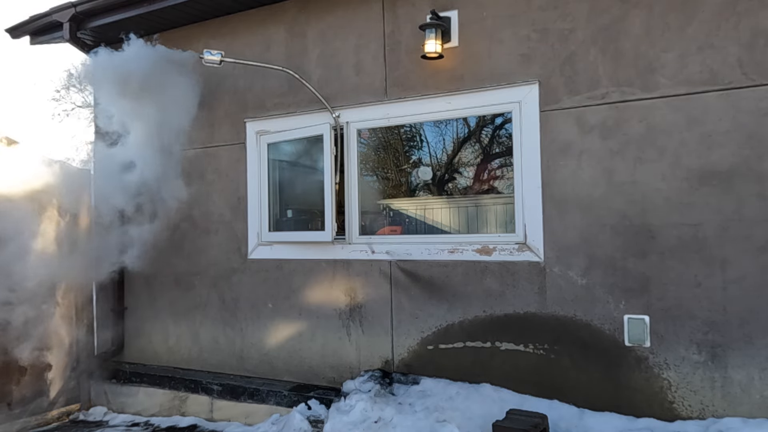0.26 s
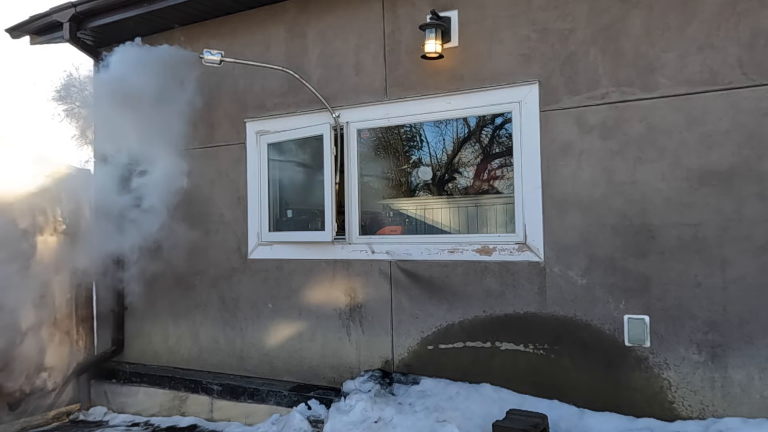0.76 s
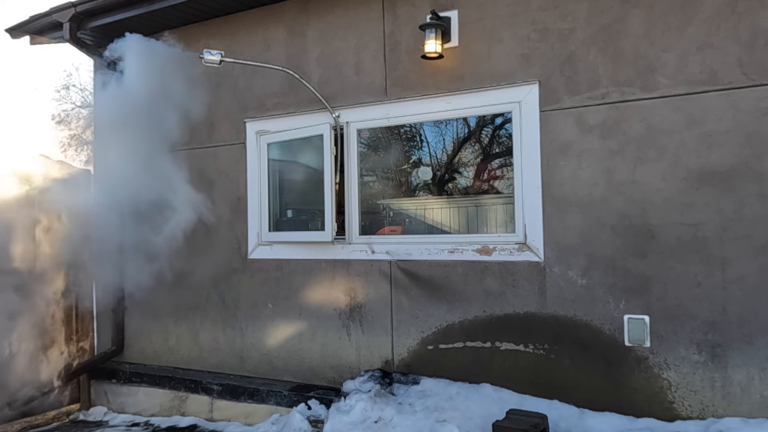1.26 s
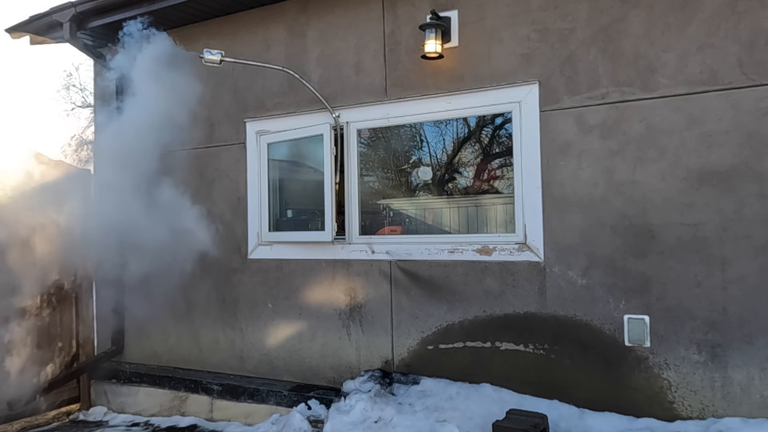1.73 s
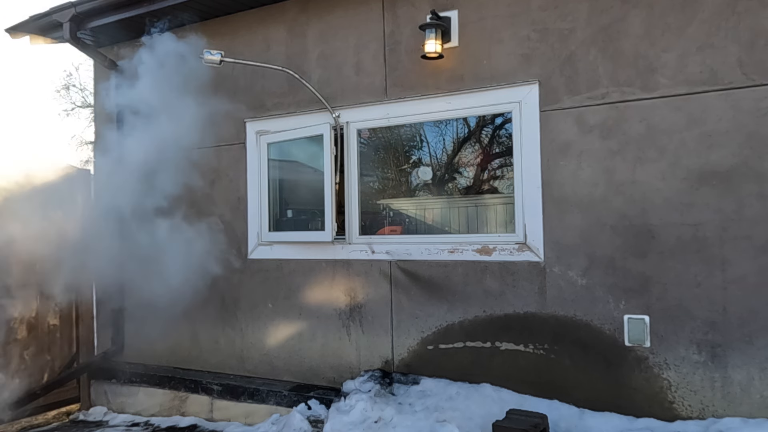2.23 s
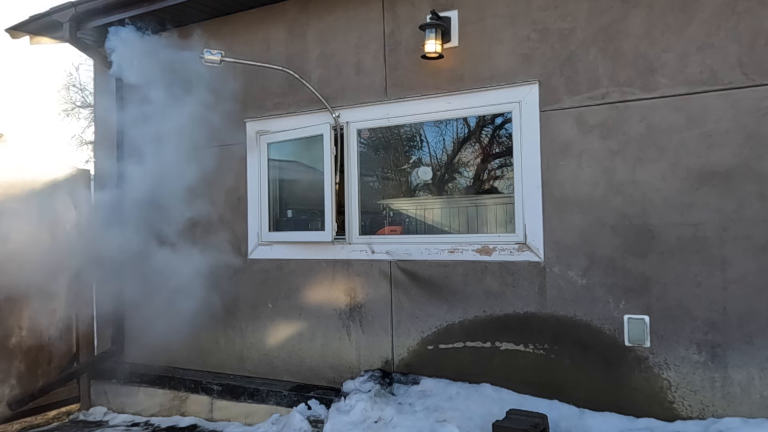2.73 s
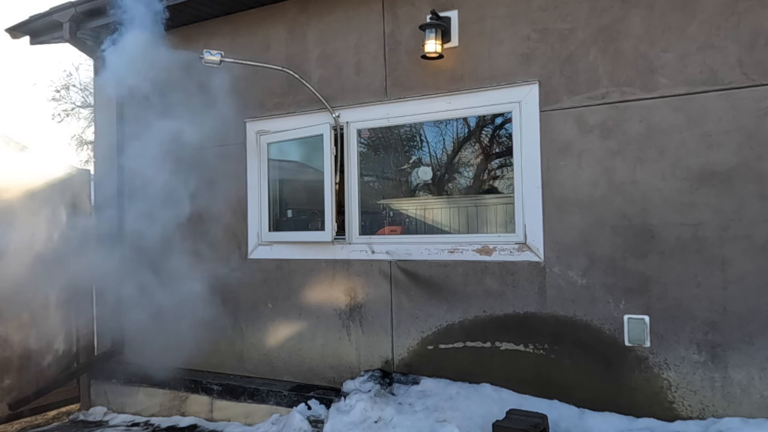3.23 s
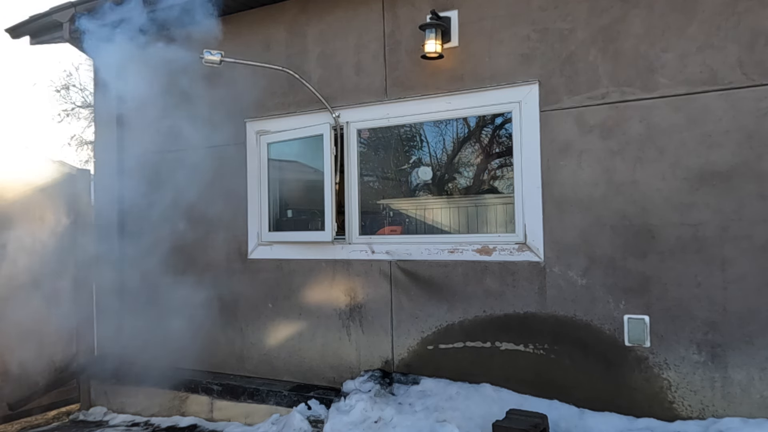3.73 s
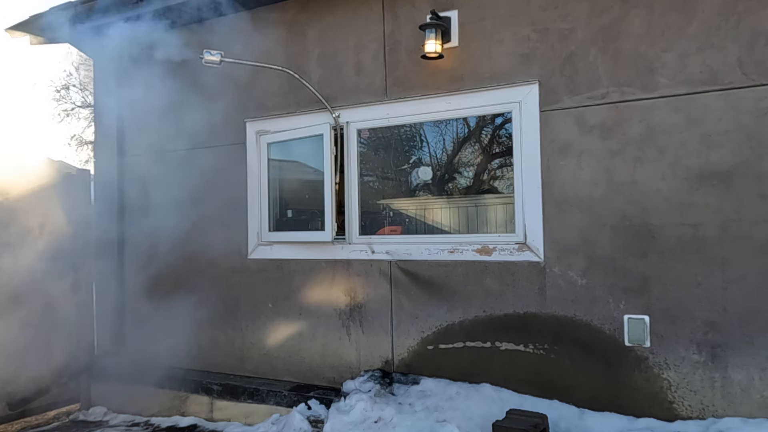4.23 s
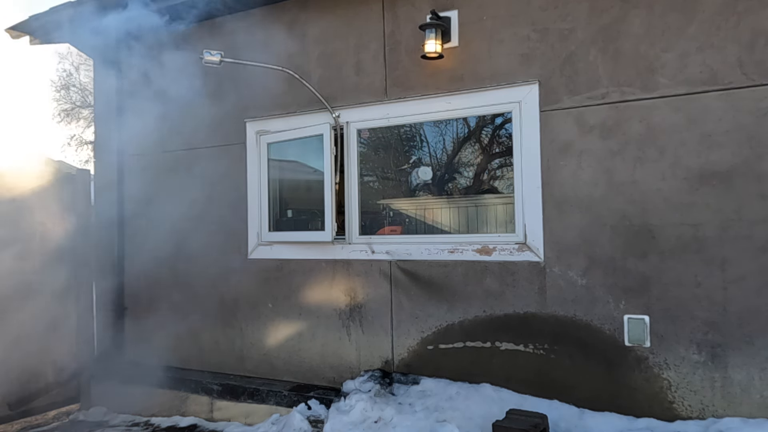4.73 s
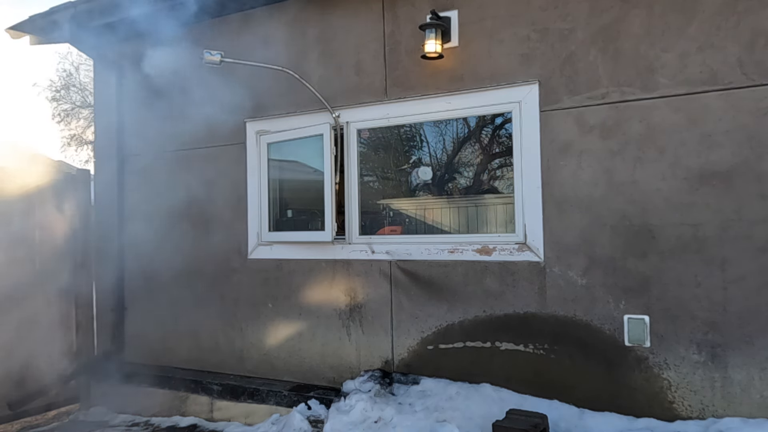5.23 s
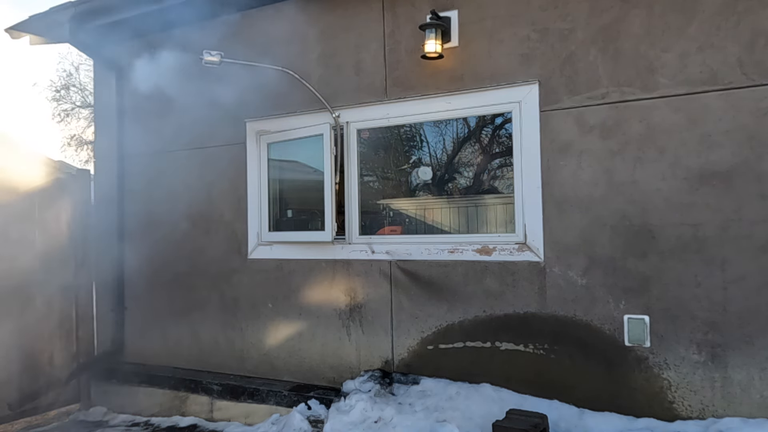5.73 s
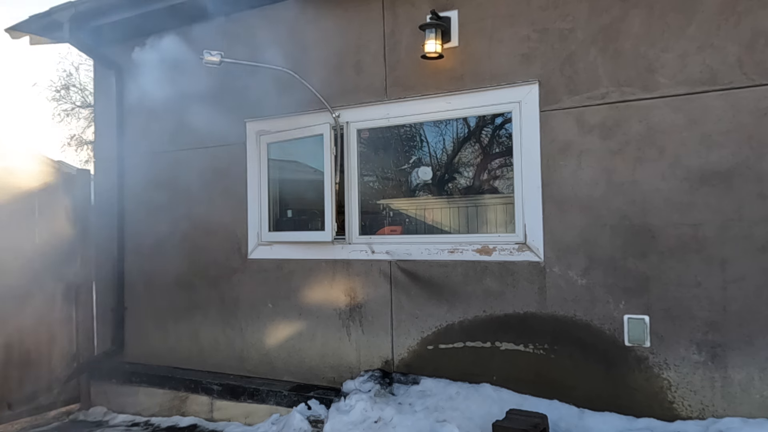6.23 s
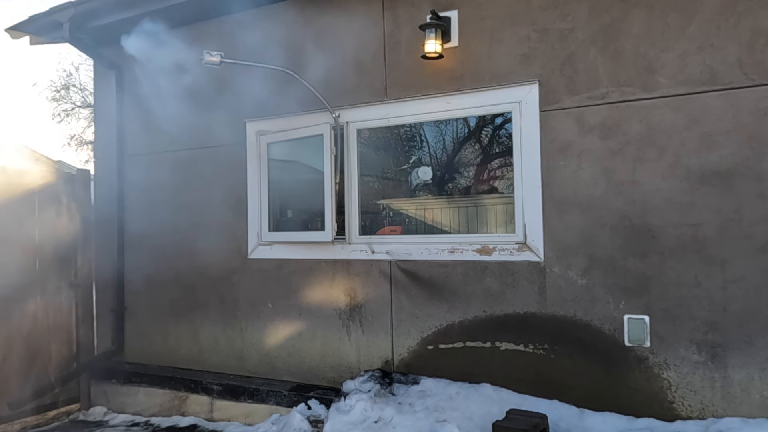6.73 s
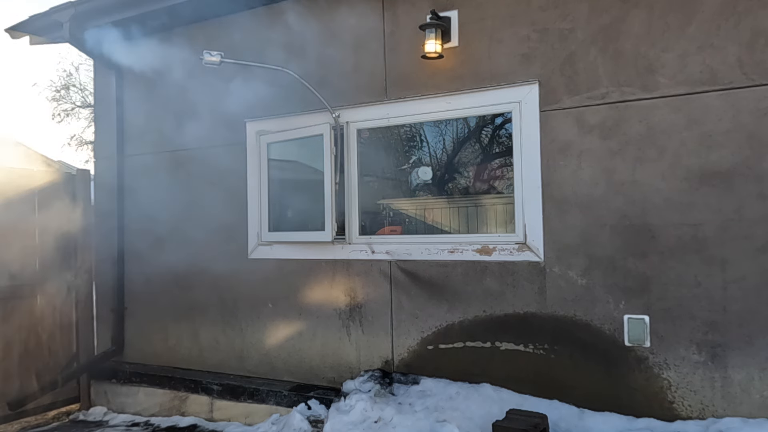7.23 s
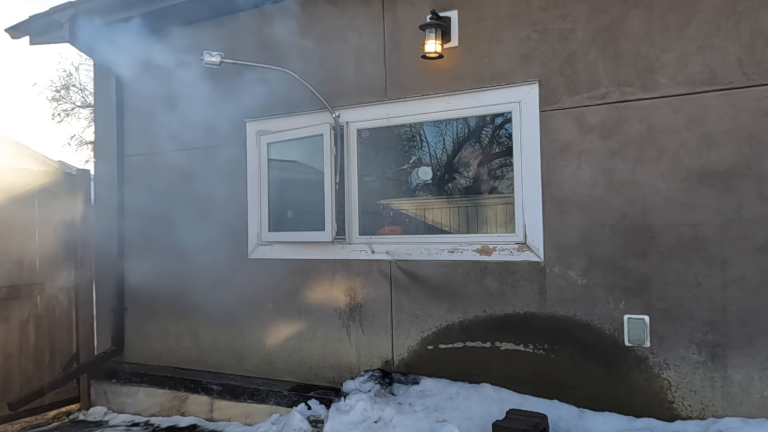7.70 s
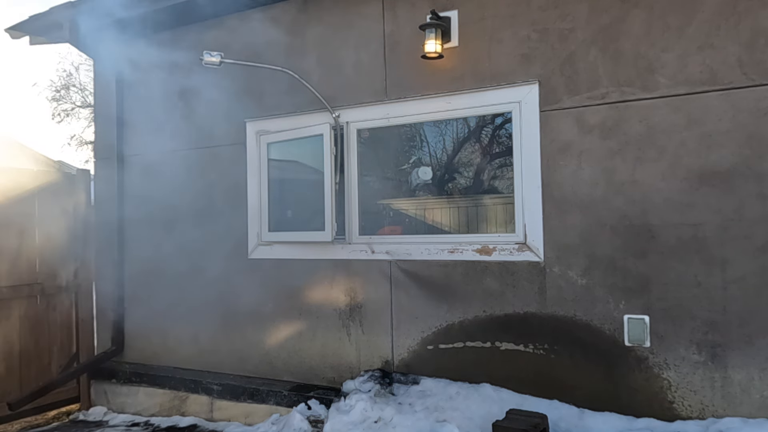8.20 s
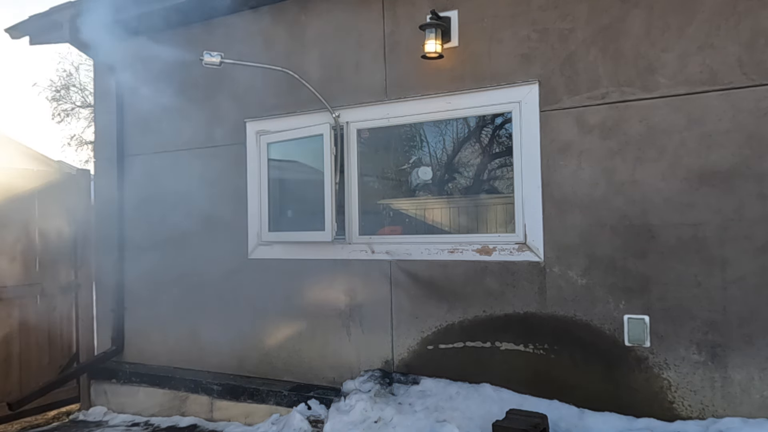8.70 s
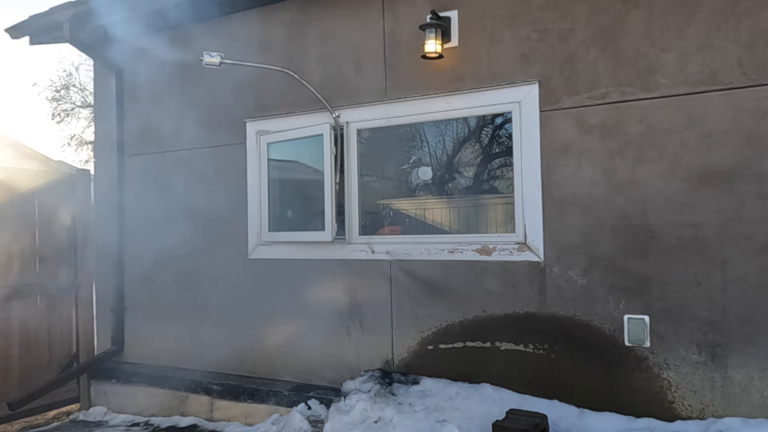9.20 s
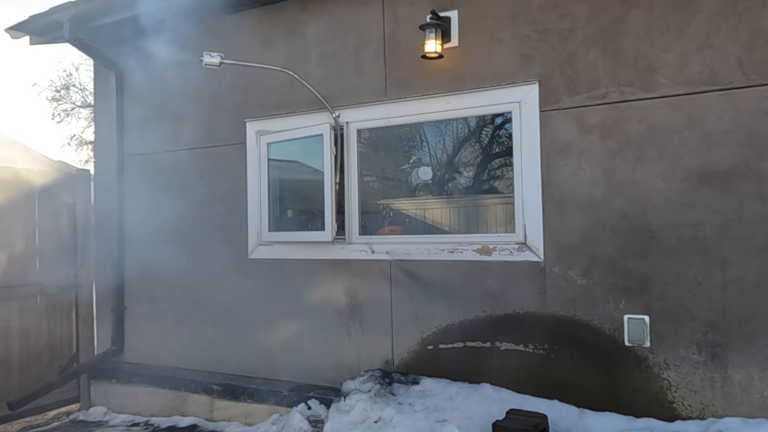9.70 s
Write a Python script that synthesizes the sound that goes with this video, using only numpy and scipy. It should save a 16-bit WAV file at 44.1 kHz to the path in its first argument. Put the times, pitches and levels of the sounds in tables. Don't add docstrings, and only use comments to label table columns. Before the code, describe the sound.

A close outdoor stereo take of a heater exhaust: dark throbbing rumble, hollow pipe resonance, soft air hiss and a thin constant whine. Low gusts buffet the microphone, mostly on the right, in the first seconds, midway and at the end. Light regular drips and scattered brittle snaps sit on top, with a far bird chirping three times while the burner slowly eases down.

```python
import sys
import numpy as np
from scipy import signal
from scipy.fft import rfft, irfft, next_fast_len
from scipy.io import wavfile
from scipy.ndimage import uniform_filter1d

SR = 44100
rng = np.random.default_rng(int(sys.argv[2]) if len(sys.argv) > 2 else 0)


def wav_out(sig):
    wavfile.write(sys.argv[1], SR, np.round(np.clip(np.atleast_2d(sig).T, -1, 1) * 32767).astype(np.int16))


def boost_factor(decibels):
    exponent = np.asarray(decibels, float) / 20
    return 10 ** exponent


N = 438794
TIME = np.arange(N) / SR


def level(x, db):
    return x * boost_factor(db) / np.sqrt(np.mean(x ** 2))


def columns(table):
    s, *rest = np.transpose(table)
    return [np.interp(TIME, s, c) for c in rest]


def walk(rate):
    k = int(SR / rate)
    held = np.repeat(rng.standard_normal(N // k + 1), k)
    return 1.03 * uniform_filter1d(uniform_filter1d(held, k), k)[:N]


def colour(x, points):
    hz, db = np.transpose(points)
    size = next_fast_len(N)
    f = np.arange(size // 2 + 1) * SR / size + 1
    gain = boost_factor(np.interp(np.log(f), np.log(hz), db))
    return irfft(rfft(x, size) * gain, size)[:N]


def ring(x, hz, width):
    return signal.lfilter(*signal.iirpeak(hz, hz / width, fs=SR), x)


def resonate(modes, flicker_db):
    noise = rng.standard_normal((2, N))
    out = 0
    for hz, width, db in modes:
        drive = np.roll(noise, rng.integers(N), axis=1)
        mode = ring(ring(drive, hz, width), hz, width)
        out = out + boost_factor(db + flicker_db * walk(8.1)) * mode
    return level(out, 0)


def flame():
    # (time [s], level [dB])
    burn = [(0, -1), (.6, 0.5), (1.2, -0.5), (2.1, 1), (2.6, 0.5), (3.6, .3), (4.1, -1.4), (4.6, -2),
            (5.4, -3.5), (6.1, -2.5), (7, -4.5), (8, -6), (9, -4.5), (9.95, -8)]
    surges_db = [2.5, 2.5, 2.1, 0.7, 2.2, 2.4, 3.1, 3.7, 1.5, 4.3, 3.1, 2.8, 4.7]
    # (frequency [Hz], width [Hz], level [dB])
    deep_modes = [(58.4, 29, -9), (71.5, 16, -1.5), (91.4, 54, -11)]
    boom_modes = [(114.8, 9.6, -5), (123, 14.5, 0.5)]
    pipe_modes = [(161, 43, -5), (212, 68.5, -1.5), (275.2, 28.4, -4), (307.5, 13.5, -4), (342.4, 45, -3.5),
                  (410.2, 31.3, 3), (468, 36, -3), (509.7, 47.6, -3), (584.7, 80, -8), (635, 114, -18.5),
                  (693.5, 63, -10)]
    upper_modes = [(816, 163, -1.5), (790, 20, -37), (962, 135, 2.5), (1021, 46, -9.5), (1072, 78, 3.5),
                   (1211, 140, 0), (1266, 85, -1), (1412, 52, -4.5), (1513, 62, -5)]

    first_s, period_s, rise_s = -.04, .795, 0.17
    surge_db = 0
    for k, db in enumerate(surges_db):
        u = np.maximum(TIME - first_s - k * period_s, 0) / rise_s
        surge_db = surge_db + db * u * np.exp(1 - u)
    effort_db, = columns(burn)

    def drive(db, effort_share, surge_share, flutter_db):
        return boost_factor(db + effort_share * effort_db + surge_share * surge_db + flutter_db * walk(7))

    motor = boost_factor(.5 + 1.2 * walk(5)) * np.sin(2 * np.pi * 120 * TIME)
    boom = boost_factor(-5.5) * resonate(boom_modes, flicker_db=-1.5) + boost_factor(2.0) * np.array([motor, motor])
    boom = drive(-41.5, 0.85, 1.83, 1.55) * boom
    roar = drive(-42, 1.08, 1.05, 0.3) * resonate(pipe_modes, flicker_db=1.5)
    deep = drive(-38.83, 0.74, 0.6, 1.2) * resonate(deep_modes, flicker_db=-1.5)
    upper = drive(-50, .75, .35, .15) * resonate(upper_modes, flicker_db=.4)
    return deep + boom + roar + upper


def air_stream():
    # (frequency [Hz], density [dB per Hz])
    stream = [(1350, -11), (1560, -4.5), (1640, -8.5), (1800, -10), (2360, -7), (2900, -13), (3380, -14),
              (3720, -17), (4300, -20.5), (4810, -21.5), (6020, -27.5), (7330, -23.5), (8490, -34.5),
              (10500, -35), (12500, -41)]
    # (frequency [Hz], width [Hz], level [dB])
    duct = [(1687, 24, 6.5), (2053, 10, 6.1), (2356, 18, 4.8), (2570, 36, 3.4), (2815, 53, 7),
            (3000, 29, 2.2), (3400, 62, 3.8), (4700, 23, 10), (4970, 82, 5.4), (5660, 83, 6.6),
            (7210, 32, 9.4), (7640, 76, 2)]
    hiss = np.array([colour(rng.standard_normal(N), stream) for _ in range(2)])
    lift = 0
    for hz, width, db in duct:
        lift = lift + (boost_factor(db) - 1) * boost_factor(0.79 * walk(4.3)) * ring(hiss, hz, width)
    return level(hiss + lift, -55) * boost_factor(0.1 * walk(6.7))


def blower_tones():
    # (time [s], frequency [Hz])
    blower = [
        (0.0, 1571),
        (0.05, 1560),
        (1.02, 1553),
        (4.55, 1557),
        (5.85, 1564),
        (7.12, 1555),
        (9.95, 1559),
    ]
    # (multiple [1], level [dB])
    shaft = [(1, -48.5), (6, -76), (9, -63.5), (11, -77.5), (18, -67.5), (20, -77), (22, -108.5), (38, -77)]
    blades = 21
    blade_hz, = columns(blower)
    shaft_hz = blade_hz / blades * (1 + 0.00099 * walk(12))
    turn = 2 * np.pi * np.cumsum(shaft_hz) / SR
    out = boost_factor(-58 + 1.4 * walk(7.4) + 0.65 * walk(7.8)) * np.sin(blades * turn)
    for k, db in shaft:
        out = out + boost_factor(db + 3 + 1.8 * walk(3.6)) * np.sin(round(k) * turn + rng.uniform(0, 2 * np.pi))
    return out


def mains_hum():
    # (multiple of 60 Hz [1], level [dB])
    harmonics = [(1, -52), (3, -61), (4, -63), (5, -68.5), (6, -64)]
    out = 0
    for k, db in harmonics:
        phase = 2 * np.pi * (round(k) * 60 * TIME + rng.uniform())
        out = out + boost_factor(db + 3 + 1.2 * walk(3)) * np.sin(phase)
    return out


def wind():
    # (time [s], level [dB], left minus right [dB], swirl between ports [dB])
    gusts = [(0, -37.5, -6, 3), (.3, -60, -8, 7), (.62, -35, -7, 4), (1, -35, -10.5, 1), (1.2, -45, -11, 8),
             (1.8, -43, 6, 9), (2.45, -41.5, 4.5, 7), (2.85, -39, -5.5, 3), (3.3, -57, 0, -5),
             (3.75, -45, 0, 1), (4.08, -33.5, -7, 0), (4.26, -38.5, -7, 0), (4.5, -52.5, 0, -2.5),
             (8.76, -45.5, 0, 2.5), (8.9, -44, -7, 0), (9.25, -37, -3, 0), (9.45, -37, -12, 2),
             (9.95, -40.5, -6, 12)]
    # (time [s], peak level [dB], frequency [Hz])
    buffets = [
        (0.632, -13.5, 45.8),
        (0.808, -32, 43.1),
        (0.952, -12.5, 48.4),
        (4.149, -16.5, 48.4),
        (4.218, -21, 37.7),
        (8.883, -14, 50.7),
        (8.912, -25, 68),
        (9.093, -19, 57.1),
        (9.399, -19.5, 83),
        (9.449, -25, 37.7),
    ]
    gust_db, pan_db, swirl_db = columns(gusts)
    gust_db = gust_db + 2.5 * walk(10)
    pan_db = pan_db + swirl_db * walk(10)
    low_colour = [(8, 6.0), (20, 19.5), (50, 21.5), (62, -2), (90, -57.5)]
    high_colour = [(40, -12), (65, -5), (130, -30), (300, -31.5), (600, -75), (2000, -110)]
    low = level(colour(rng.standard_normal(N), low_colour), 0)
    high = level(colour(rng.standard_normal(N), high_colour), -9.0)
    reach = boost_factor(0.98 * (gust_db + 38.5) + 1.9 * walk(60))
    out = boost_factor(gust_db + np.array([pan_db, -pan_db]) / 2) * (low + reach * high)
    for s, db, hz in buffets:
        u = (TIME[:4000] - .045) * hz
        eddy = np.exp(-(u / 0.3) ** 2) * np.sin(2 * np.pi * u)
        i = int((s - .033) * SR)
        thump = boost_factor(db - 2) * eddy * boost_factor(np.array([[-2.5], [2.5]]))
        out[:, i:i + len(u)] += thump[:, :N - i]
    return out


def bursts(rows):
    out = np.zeros((2, N))
    u = TIME[:1800]
    grain = u / .0013 * np.exp(1 - u / .0013)
    tail = .1 * (1 - np.exp(-u / .002)) * np.exp(-u / .022)
    for s, db, pan_db, hz, width in rows:
        same, left, right = rng.standard_normal((3, len(u)))
        burst = (same + 0.44 * np.array([left, right])) * (grain + tail)
        burst = ring(ring(burst, hz, width), hz, width)
        i = int((s - .0003) * SR)
        gain = boost_factor(db + np.array([[pan_db], [-pan_db]]) / 2) / np.sqrt(np.mean(burst[:, :220] ** 2))
        out[:, i:i + len(u)] += (gain * burst)[:, :N - i]
    return out


def splash_and_tick(hits):
    rows = [(s, db - 13.5, 6, 12800., 9500.) for s, db, _, _ in hits]
    rows += [(s, db - 9, .6, hz, 3400.) for s, _, db, hz in hits]
    return bursts(rows)


def drips():
    # (time [s], splash level [dB], tick level [dB], tick frequency [Hz])
    steady = [
        (3.93, -61, -66, 4800),
        (4.5695, -42.5, -51, 4350),
        (5.216, -56, -57, 7130),
        (5.8596, -63, -51, 6850),
        (6.5096, -53, -49, 4620),
        (7.1578, -55, -47, 6500),
        (7.8105, -54, -46.5, 4940),
        (8.4594, -59, -52, 4970),
        (9.1127, -46, -51, 6790),
        (9.7597, -51, -52, 4240),
    ]
    quicker = [(.6769, -46, -64, 6000), (1.3798, -56, -52, 4680), (2.0862, -61, -66, 5000),
               (2.7686, -61, -66, 5000), (3.4089, -51, -50, 5260), (4.0662, -65, -66, 5000),
               (4.6872, -63, -66, 4860), (5.8147, -60, -52, 4840), (6.3764, -59, -66, 5000),
               (6.9426, -54, -66, 5000), (7.5038, -48, -51, 6820), (8.0674, -53, -48, 4570),
               (8.627, -47, -47, 5100), (9.186, -40, -46.5, 4800), (9.7368, -65, -54, 4600)]
    return splash_and_tick(steady + quicker)


def crackles():
    # (time [s], splash level [dB], tick level [dB], tick frequency [Hz])
    snaps = [(.1351, -56, -66, 5000), (.1516, -55, -66, 5000), (.1845, -56, -66, 5000),
             (.2234, -63, -75, 5000), (.2394, -58, -66, 5000), (0.666, -58, -48, 6840),
             (.7133, -59, -66, 5000), (0.754, -54, -40, 5070), (1.4154, -64, -61, 4870),
             (3.0784, -69, -50, 4754), (3.3653, -64, -66, 5000), (3.4266, -48, -66, 5000),
             (4.1497, -69, -48, 4010), (4.195, -68, -45.5, 4400), (4.4493, -60, -66, 5000),
             (4.4787, -61, -66, 5000), (4.6224, -52, -66, 5000), (6.2427, -48, -66, 5400),
             (6.4313, -52, -52, 5660), (6.4911, -63, -66, 5000), (6.9591, -57, -66, 5000),
             (7.5532, -57, -55, 4150), (8.162, -61, -46.5, 6100), (8.1868, -47, -66, 5000),
             (8.8977, -55, -64, 5000), (9.2451, -60, -55, 4200), (9.293, -48, -49, 6950),
             (9.3701, -55, -66, 5000), (9.8316, -58, -66, 4900)]
    # (time [s], peak level [dB], frequency [Hz])
    faint = [(.2833, -52, 4210), (.687, -57, 12000), (.772, -54, 6200), (.837, -57, 4750),
             (1.415, -49, 3500), (2.6933, -51, 4200), (2.725, -49, 3300), (3.0964, -56, 6200),
             (3.5109, -49.5, 5500), (3.638, -55, 4930), (4.582, -55, 11500), (5.319, -46, 3100),
             (9.1294, -62, 9000), (9.2044, -57, 9000), (9.3064, -50, 7100)]
    return splash_and_tick(snaps) + bursts([(s, db - 8, .7, hz, 2500.) for s, db, hz in faint])


def bird():
    # (start [s], length [s], from [Hz], to [Hz], level [dB])
    song = [(1.312, .038, 3720, 3330, -63), (1.374, .092, 3640, 3120, -61), (1.508, .04, 2750, 2600, -63.5),
            (4.743, .02, 3430, 3250, -67), (4.774, .022, 3950, 3750, -68), (4.803, .066, 3600, 3110, -61),
            (4.88, .034, 2760, 2590, -61), (7.245, .03, 3480, 3200, -64), (7.318, .026, 3450, 3280, -69),
            (7.348, .036, 3330, 2950, -62), (7.4, .055, 2860, 2760, -69)]
    settle_s = .036
    out = np.zeros(N)
    for s, length, from_hz, to_hz, db in song:
        u = TIME[:int(length * SR)] / length
        fallen = np.expm1(-u * length / settle_s) / np.expm1(-length / settle_s)
        hz = from_hz + (to_hz - from_hz) * fallen
        tone = np.sin(np.pi * u) ** .7 * np.sin(2 * np.pi * np.cumsum(hz) / SR)
        out[int(s * SR):int(s * SR) + len(u)] += boost_factor(db + 5.5) * tone
    out = out * boost_factor(1.2 * walk(70))
    return out + boost_factor(-8) * np.roll(out, int(.034 * SR)) + boost_factor(-15) * np.roll(out, int(.061 * SR))


def bird_in_yard():
    song = bird()
    decay_s, lag_s = .045, 5e-5
    yard = []
    for noise in rng.standard_normal((2, SR // 5)):
        response = noise * np.exp(-TIME[:len(noise)] / decay_s)
        yard.append(signal.oaconvolve(song, response)[:N])
    direct = np.array([np.roll(song, round(lag_s * SR)), song]) * boost_factor(np.array([[0], [2]]))
    return direct + boost_factor(-7) * np.array(yard) / np.sqrt(decay_s * SR / 2)


def scene():
    # (frequency [Hz], side minus mid [dB])
    spread = [(60, -16), (110, -31), (200, -12.5), (360, -13.5), (660, -9), (1210, -6), (2210, -5.5),
              (4030, -6.5), (7360, -22), (13400, -15)]
    mid, scattered = flame() + air_stream()
    mid = mid + blower_tones() + mains_hum()
    side = colour(scattered, spread) * boost_factor(-3.5) - 0.34 * np.gradient(mid)
    heater = np.array([mid + side, mid - side])
    return heater + wind() + drips() + crackles() + bird_in_yard()


def top_cut(x):
    return signal.sosfilt(signal.butter(12, 16200, fs=SR, output="sos"), x)


def record(dry):
    # (frequency [Hz], density [dB per Hz])
    capsule = [(3000, -3), (7000, -10.5), (11500, -8), (13000, -6), (13600, -9), (14200, -22)]
    # (frequency [Hz], level [dB])
    top = [(11800, -1), (12800, -4.5), (13500, -9), (14500, -14), (16200, -26)]
    hiss = np.array([level(colour(rng.standard_normal(N), capsule), db) for db in (-73, -80)])
    heard = np.array([colour(port, top) for port in dry + hiss])
    return top_cut(heard)


dry = scene()
out = record(dry)
wav_out(out)
```